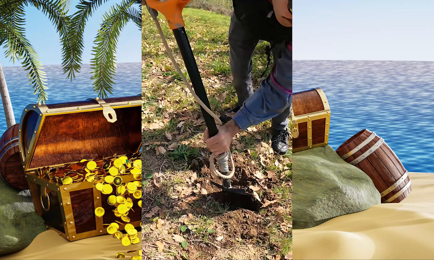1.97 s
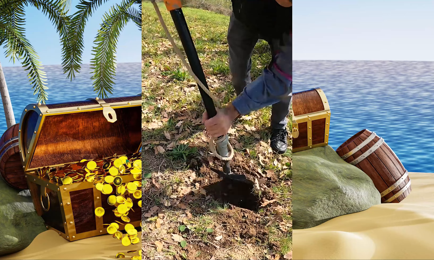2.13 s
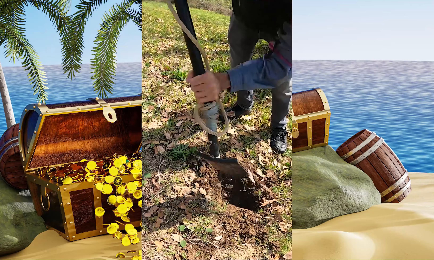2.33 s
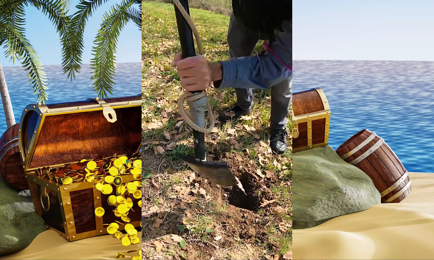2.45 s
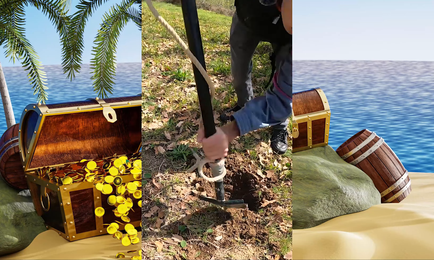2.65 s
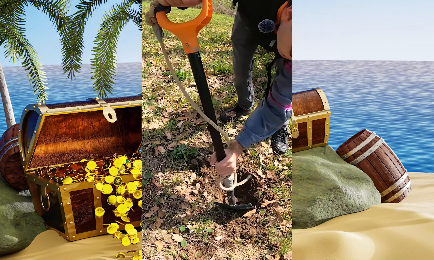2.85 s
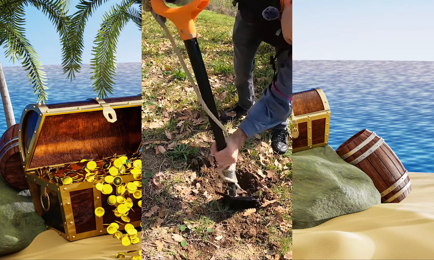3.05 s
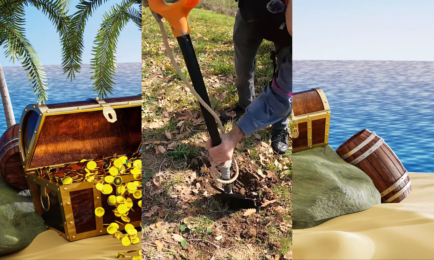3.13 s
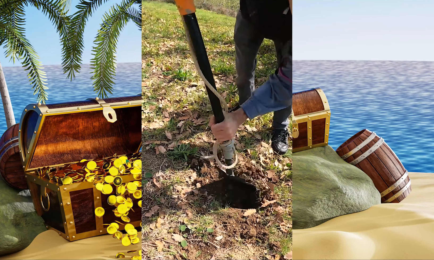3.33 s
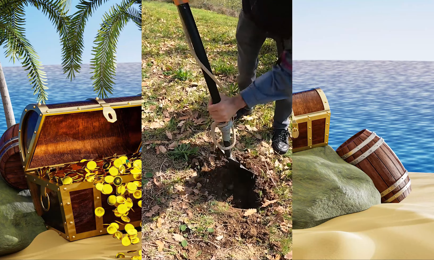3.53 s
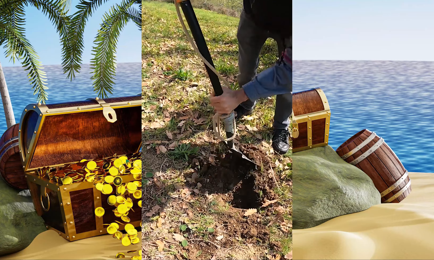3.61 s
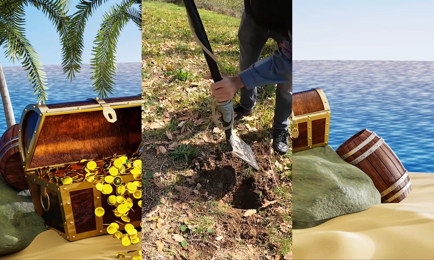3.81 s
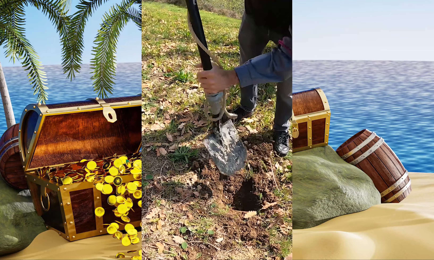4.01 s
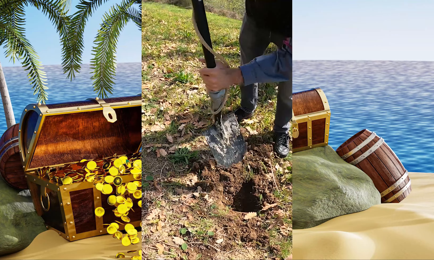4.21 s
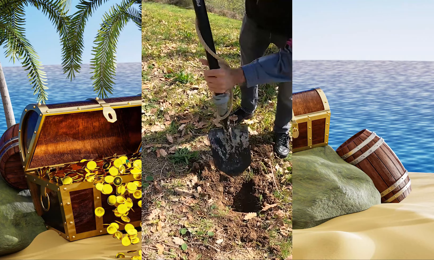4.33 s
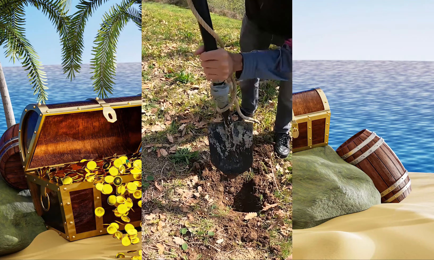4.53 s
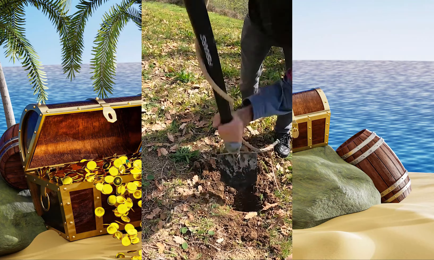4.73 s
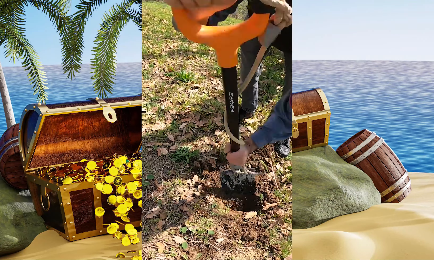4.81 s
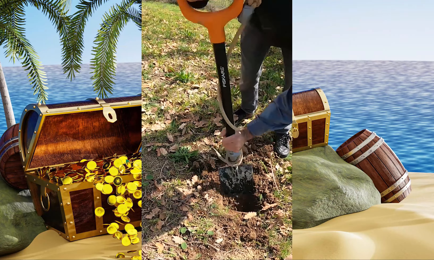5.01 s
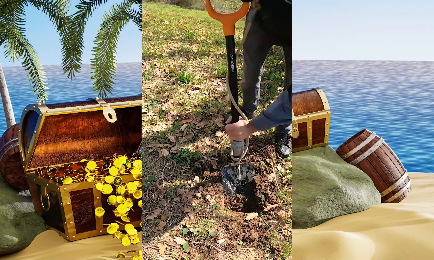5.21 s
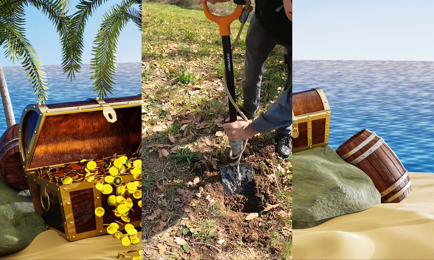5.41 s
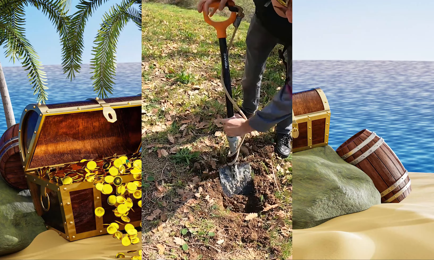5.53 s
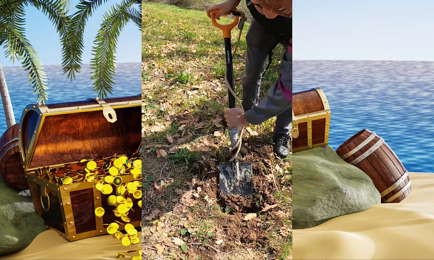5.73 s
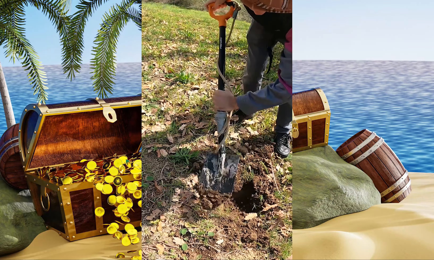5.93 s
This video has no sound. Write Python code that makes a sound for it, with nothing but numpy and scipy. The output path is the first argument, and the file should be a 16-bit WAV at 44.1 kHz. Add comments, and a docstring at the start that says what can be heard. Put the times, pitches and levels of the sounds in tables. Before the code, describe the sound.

Close, irregular spade strikes crunch and clank briefly in leafy ground, loose dirt pours and patters, and one hardest chop lands near the end.

```python
"""Outdoors, on dry ground under leaves: a steel spade chops into the soil close to the microphone.
Each bite is a burst of tiny fractures that also ring the blade briefly; the deep stabs thud the ground.
Earth pours off the lifted blade as filtered grain noise; stalks and struck stones tick, lumps land, a
pebble squeaks and crumbs patter; one hard chop follows near the end. Shaped noise gives faint wind and
distant rumble."""
import sys
import numpy as np
from scipy import signal
from scipy.fft import rfft, irfft
from scipy.io import wavfile
from scipy.ndimage import uniform_filter1d

SR = 44100
rng = np.random.default_rng(int(sys.argv[2]) if len(sys.argv) > 2 else 0)


def master_out(mix):
    """Clip the mix to full scale and print it as 16-bit PCM to the path in sys.argv[1]."""
    frames = np.transpose(np.atleast_2d(mix))
    ceiling = np.clip(frames, -1, 1)
    pcm = np.round(ceiling * 32767).astype(np.int16)
    wavfile.write(sys.argv[1], SR, pcm)


N = 262830
TIME = np.arange(N) / SR

# bites of the blade: t/s, level/dB, rise/s, push/s, then tilts before levelling: weight/dB at 250 Hz,
# knock/dB at 800-1100 Hz, grit/dB at 8 kHz; last, blade pitch/factor
BITES = [ (.177, -30.5, 0.02, 0.012, -0.5, 0.5, 2.5, 1.03), (.220, -32.5, .001, 0.0048, -13, 3.5, 2, .95),
         (.730, -39.5, 0.0016, 0.0085, -6, 5.5, -2, 1.12), (1.5, -37, .006, .001, -4.5, 0, 2.5, 1),
         (1.506, -16, 0.0029, 0.0047, -6.5, 0, 6, 1.1), (1.514, -21, 0.00054, 0.0084, -8, 6.5, -1.5, 1),
         (1.532, -38, .001, .002, 1, 2, 0.5, .96), (1.952, -49, 0.00038, 0.0079, 2, 10, -5, 1),
         (1.979, -48, 0.0032, 0.0047, -4, -15, 6, 1), (2.0, -27, 0.0021, 0.0018, -19, -12, -11, .84),
         (2.235, -46.5, .003, 0.0028, -4, 0, -2, 1), (2.249, -41.5, 0.0064, 0.02, -13.5, -3, -6.5, .95),
         (2.806, -51, 0.00091, 0.0022, -5, 8.5, -7.5, 1.2), (2.842, -49.5, 0.0074, 0.058, -10.5, -3, -3, 1),
         (2.914, -15, .006, 0.00085, -14, -13.5, -2.5, 1.03), (2.93, -38, .001, 0.015, -8, 4, 4.5, 1),
         (2.967, -44.5, .001, .006, -9, 4, -5, 1.23), (3.197, -46.5, 0.0013, 0.0018, 2, 0.5, 4.5, 1),
         (3.252, -39, 0.0037, .013, -9, -4.5, -6.5, .86), (3.447, -40, .002, 0.0022, -4.5, 8.5, -8, .95),
         (3.476, -36.5, .009, 0.0069, -10, -1, -3, .92), (3.542, -45.5, 0.0068, 0.0074, -2.5, 9, -6, .9),
         (4.989, -7, 0.0017, .002, -18.5, -1, -8.5, .99), ]


def amp(db):
    """Decibels to gain."""
    return 10 ** (np.asarray(db) / 20)


def evened(x):
    """Scales to an rms of one."""
    return x / np.sqrt(np.mean(x ** 2) + 1e-20)


def read(points, hz):
    """Reads a spectrum on a log-frequency axis."""
    f, value = np.transpose(points)
    return np.interp(np.log(hz + 1), np.log(f + 1), value)


def add(mix, s, sound):
    """Mixes a sound in at a time, cut off at the end of the mix."""
    part = mix[max(round(s * SR), 0):][:len(sound)]
    part += sound[:len(part)]


def colour(x, *spectra, size=4096):
    """Minimum-phase filter of unit energy with the product of the given spectra (f/Hz, level/dB)."""
    hz = abs(np.fft.fftfreq(size, 1 / SR))
    log_gain = np.log(amp(sum(read(points, hz) for points in spectra)))
    response = np.exp(np.conj(signal.hilbert(log_gain)))
    taps = np.fft.ifft(response).real[:size // 2]
    return signal.oaconvolve(x, taps / np.linalg.norm(taps))[:len(x)]


def wander(count, per_s):
    """Straight lines between random knots of unit spread, per_s knots a second."""
    knots = rng.standard_normal(count // 16 + 2)
    return np.interp(np.arange(count) / SR * per_s, np.arange(len(knots)), knots)


def swell(s, rise_s, fall_s, roundness=1):
    """Grows towards a moment and dies away after it."""
    distance = np.maximum((s - TIME) / rise_s, (TIME - s) / fall_s)
    return np.exp(-distance.clip(0, 20) ** roundness)


def fractures(count, per_s, spread_db):
    """A swarm of tiny breaks of random sign: many small, a few large."""
    chance, size, sign = rng.random((3, count))
    size = amp(spread_db * np.minimum(-np.log(1 - size), 4))
    breaks = chance < per_s / SR
    return evened(breaks * size * np.sign(sign - .5))


def patchy(x, patchy_db):
    """The colour of a rustle drifts as different leaves and clods take part."""
    z = signal.stft(x, nperseg=512)[2]
    patches = rng.standard_normal(z.shape)
    for axis in 0, 1:  # smooth over frequency, then time
        patches = uniform_filter1d(patches, size=12, axis=axis)
    shaped = z * amp(patchy_db * evened(patches))
    return evened(signal.istft(shaped, nperseg=512)[1][:N])


def air(level_db=-54, gust_db=1.0):
    """Light wind at the microphone over a far rumble: shaped noise whose low end gusts."""
    # wind and distant rumble: f/Hz, level per Hz/dB before levelling
    air_spectrum = [(10, 6), (30, 1.5), (55, 4.5), (90, 0), (135, -9), (250, -18), (450, -15), (850, -15.5),
                    (1400, -22.5), (2500, -33.5), (5000, -36), (10000, -40.5), (15500, -44)]
    hz = np.fft.rfftfreq(N, 1 / SR)
    wash = evened(irfft(rfft(rng.standard_normal(N)) * amp(read(air_spectrum, hz)), N))
    wind = signal.sosfilt(signal.butter(1, 150, fs=SR, output="sos"), wash)
    gusts = amp(gust_db * wander(N, per_s=23))
    return amp(level_db) * (wash + wind * (gusts - 1))


def scatter(x, wet_db, t60=0.17, rise_s=0.021):
    """Open ground scatters a short, diffuse tail: decaying noise that swells in first."""
    t = np.arange(SR // 3) / SR
    tail = rng.standard_normal(len(t)) * np.minimum(t / rise_s, 1) ** 2 * amp(-60 * t / t60)
    tail = colour(tail, [(150, 3.5), (700, 2.5), (2500, -4.5), (8000, -3.5), (15000, 2.5)])
    return amp(wet_db) * signal.oaconvolve(x, tail / np.linalg.norm(tail))[:N]


def loose_earth():
    """Flow and coarseness of all that moves: a trickle, the pour, each rustle and the spill round bites."""
    # earth pouring off the lifted blade: t/s, flow level/dB
    pour_levels = [(3.451, -77), (3.52, -57.5), (3.64, -61), (3.8, -55.5), (4.03, -49.5), (4.09, -60),
                   (4.2, -65.5), (4.3, -78)]
    # nudged leaves and loose earth: t/s at the peak, flow level/dB, length/s,
    # coarseness/dB (more clods, less fine dust)
    rustles = [(.01, -52.5, 0.11, -11), (.12, -65, 0.11, 13), (.68, -63.5, .08, -7), (.86, -61.5, 0.16, -4),
               (1.245, -62, 0.15, 10.5), (1.42, -63.5, 0.098, -6), (1.65, -63, 0.19, 0),
               (1.89, -65, .06, -12), (3.09, -68.5, .12, 18), (3.33, -63.5, 0.042, 8),
               (4.28, -66.5, .07, -19), (4.52, -66.5, 0.114, -10.5), (4.85, -68.5, 0.23, 1),
               (5.379, -60, 0.22, 10), (5.66, -68, .3, 0)]
    rustle_rise = 0.43  # share of a rustle's length spent swelling
    spill_db, spill_db_per_db = -55, 0.25  # flow at a bite of 0 dB, and its change per dB of bite
    spill_above_db = -44  # lighter touches stir nothing
    spill_lead_s, spill_settle_s, spill_coarse_db = 0.07, 0.088, 4.5
    after_db, after_settle_s = -10, .33  # part of each spill keeps running down the heap

    moves = [(amp(-78.5), 0.5)]  # the heap never quite rests
    s, pour_db = np.transpose(pour_levels)
    pour = amp(np.interp(TIME, s, pour_db)) * (TIME > s[0]) * (TIME < s[-1])
    moves.append((pour, 6.5 - 14 * (TIME - s[0])))  # clods leave first, dust last
    for peak_s, db, length, coarse_db in rustles:
        rustle = swell(peak_s, length * rustle_rise, length * (1 - rustle_rise), roundness=2.1)
        moves.append((amp(db) * rustle, coarse_db))
    for share_db, settle_s in (0, spill_settle_s), (after_db, after_settle_s):
        spills = [amp(spill_db + share_db + spill_db_per_db * db) * swell(bite_s, spill_lead_s, settle_s)
                  for bite_s, db, *_ in BITES if db > spill_above_db]
        moves.append((np.max(spills, axis=0), spill_coarse_db))
    power = sum(flow ** 2 for flow, _ in moves)
    coarseness = sum(flow ** 2 * coarse_db for flow, coarse_db in moves) / power
    return np.sqrt(power), coarseness


def sliding(flow, coarse_db, fine_db=-0.5, crumb_db=-10, body_db=-7, dust_db=-20, clump_db=2.44):
    """Fine earth hisses over steel and leaves, crumbs tick in it; clods are duller, dust is brighter."""
    # sliding fine earth: f/Hz, level per Hz/dB before levelling
    sand = [(300, -16), (900, -4.5), (1500, -5), (2600, -7), (3700, -1.5), (4500, -4.5), (6300, -2.5),
            (8000, -4.5), (10300, -11.5), (12000, -15), (15500, -25.5)]
    flow = flow * amp(clump_db * wander(N, per_s=62))
    grains = fractures(N, per_s=20000, spread_db=1)
    grains = grains + amp(crumb_db) * fractures(N, per_s=490, spread_db=8.5)
    fine = amp(fine_db) * patchy(colour(grains, sand), patchy_db=1.1)
    clods = colour(fractures(N, per_s=3900, spread_db=4.5), [
        (60, -6), (200, -1.0), (500, -5.5), (1500, 1), (2400, -2.0), (4000, -14.0), (8000, -31.0)])
    clods = amp(body_db + coarse_db) * patchy(clods, patchy_db=4.0)
    dust = colour(fractures(N, per_s=9000, spread_db=2.0), [
        (2000, -30.5), (7000, -3), (11000, 1.5), (13500, 0), (15500, -5)])
    return flow * (fine + clods + amp(dust_db - coarse_db) * dust)


def patter(flow, level_db=-70, fade_s=.002, follow=.4):
    """Single grains hop over dry leaves; they stand out most when little else is moving."""
    hops = abs(fractures(N, per_s=59, spread_db=4.0))
    fades = signal.lfilter([1], [1, -np.exp(-1 / (fade_s * SR))], hops)
    crackle = evened(colour(fades * rng.standard_normal(N), [
        (300, -16.5), (1500, -6.5), (4000, 0.0), (8000, -0.5), (11000, -8.0), (15500, -18.5)]))
    return crackle * amp(level_db) * evened(flow) ** follow


def lumps(fade_s=0.019):
    """Each lump of earth lands with a dull pat: a fading noise burst, low-coloured."""
    # soft landings: t/s, level/dB at the start
    landings = [(.35, -54), (.72, -57.5), (3.553, -48), (3.85, -50), (5.209, -49.5), (5.378, -49),
                (5.526, -52.5)]
    out, t = np.zeros(N), np.arange(SR // 10) / SR
    for s, db in landings:
        add(out, s, amp(db) * rng.standard_normal(len(t)) * np.exp(-t / fade_s))
    return colour(out, [(60, 0), (170, -1.0), (300, -0.5), (500, -10), (1400, -16.5), (4000, -43)])


def squeak(s=2.967, hz=4200, level_db=-43, length_s=0.015, waver=.012):
    """The edge grazes a pebble and sings for a moment: a short, wavering sine."""
    out, t = np.zeros(N), np.arange(round(length_s * SR)) / SR
    turns = np.cumsum(hz * (1 + waver * wander(len(t), per_s=500))) / SR
    envelope = np.sin(np.pi * np.sqrt(t / length_s))
    add(out, s, amp(level_db) * envelope * np.sin(2 * np.pi * turns))
    return out


def ticks(level_db=-7, fade_s=0.0039, debris_db=-13, debris_s=0.012):
    """Short ticks with a little debris: stalks and crumbs snap, and the blade's edge strikes small stones."""
    # ticks of snapping pieces and struck stones: t/s, level/dB before the common level_db
    moments = [(0.0782, -43.5), (.188, -33), (0.2367, -35), (0.632, -43), (.646, -45), (0.8128, -45.5),
               (0.8764, -42), (1.217, -44), (1.3734, -46.5), (1.402, -42.5), (1.5229, -12.5), (1.8193, -46),
               (1.97, -44), (2.021, -41), (2.0635, -40.5), (2.289, -48), (3.049, -46.5), (3.267, -29),
               (3.28, -36.5), (3.3496, -51.5), (3.505, -43), (3.5275, -47), (4.1557, -48), (4.3698, -47),
               (4.4486, -44.5), (5.018, -27.5), (5.2176, -50.5), (5.595, -48.5)]
    tick_spectrum = [(200, 0.5), (1200, 4.0), (3000, 0), (7000, 4.0), (10000, -8.5), (12000, -10.5),
                     (15500, -27.5)]
    out, t = np.zeros(N), np.arange(SR // 10) / SR
    fade = np.exp(-t / fade_s) + amp(debris_db) * np.exp(-t / debris_s)
    for s, db in moments:
        tick = fractures(len(t), per_s=30000, spread_db=5.5) * fade
        # no two ticks sound alike
        own = np.transpose([np.geomspace(1000, 12000, num=9), 3 * rng.standard_normal(9)])
        add(out, s, amp(db + level_db) * colour(tick, own, tick_spectrum))
    return out


def thuds(t60=.35):
    """The ground shakes briefly under the deep stabs: decaying low noise."""
    # blows taken by the ground: t/s, level/dB
    blows = [(0.202, -38), (1.514, -31.5), (2.921, -35.5), (4.998, -35.5)]
    out, t = np.zeros(N), np.arange(SR // 2) / SR
    fade = amp(-60 * t / t60)
    for s, db in blows:
        shake = colour(rng.standard_normal(len(t)) * fade, [
            (14, 6), (30, -2), (70, 0.0), (130, -13.5), (300, -23.5), (1000, -68.5)])
        add(out, s, amp(db) * shake * np.linalg.norm(fade) / np.linalg.norm(shake))
    return out


def blade(force, pitch):
    """The steel rings in damped modes; its pitch shifts with how firmly the earth grips it."""
    # modes damped by the earth: f/Hz at pitch 1, level/dB before the 1/sqrt(t60) weight, t60/s
    modes = [(541, -1.5, .06), (641, -8.5, 0.12), (876.4, -1.5, 0.041), (1240, -0.5, 0.0097),
             (1499, -5.5, .04), (1616, -3, 0.03), (2130, -11, 0.046), (2733, -0.5, 0.018),
             (3417, -0.5, 0.023), (4045, -4.5, .025), (5370, -5.5, 0.016), (6860, -6.5, 0.029),
             (7150, -6, .022), (7490, -5, 0.032), (9460, -5, 0.027)]
    t = np.arange(SR // 8) / SR
    ring = sum(amp(db - 60 * t / t60) * np.sin(2 * np.pi * hz * pitch * t) / np.sqrt(t60)
               for hz, db, t60 in modes)
    return signal.oaconvolve(force, ring / np.linalg.norm(ring))[:len(force)]


def bites(clump_db=2, ring_db=-5, wall_s=0.003, wall_share=0.099):
    """Soil breaks while the blade pushes; the wall of the hole returns each crunch a moment later."""
    # breaking soil: f/Hz, level per Hz/dB before tilts and levelling
    crunch = [(40, -6.5), (150, 1.5), (330, -5), (550, -2.5), (3400, 0), (4600, 0.5), (7000, 1),
              (10200, -2), (11600, -14), (15500, -24.5)]
    release_t60 = .02  # s; the crunch dies once the blade stops
    crumble_t60 = 0.12  # s; the cut goes on crumbling a little longer
    out, t = np.zeros(N), np.arange(SR // 3) / SR
    for s, db, rise, push, weight_db, knock_db, grit_db, pitch in BITES:
        stopped = np.maximum(t - rise - push, 0)
        crumble = amp(-21.5 + 0.18 * db)  # harder bites crumble more for their size
        release = (1 - crumble) * amp(-60 * stopped / release_t60)
        release = release + crumble * amp(-60 * stopped / crumble_t60)
        stroke = np.minimum(t / rise, 1) * release
        force = stroke * fractures(len(t), per_s=20000, spread_db=2)
        force = force * amp(clump_db * wander(len(t), per_s=390))
        sound = force + amp(ring_db) * blade(force, pitch)  # each fracture also taps the steel
        sound = sound + wall_share * np.interp(t - wall_s / pitch, t, sound, left=0)
        tilts = [(250, weight_db), (800, knock_db), (1100, knock_db), (2700, 0.0039), (3600, 0.0021),
                 (8000, grit_db)]
        sound = colour(sound, crunch, tilts)
        add(out, s, amp(db) * sound * np.linalg.norm(stroke) / np.linalg.norm(sound))
    return out


def scene():
    """The digging is dead centre; only a faint hiss and a trace of scatter differ between the ears."""
    digging = bites() + ticks() + lumps() + squeak()
    flow, coarse_db = loose_earth()
    mid = digging + scatter(digging, wet_db=-27.5) + thuds()
    mid = mid + sliding(flow, coarse_db) + patter(flow) + air()
    hiss = amp(-74.5) * colour(rng.standard_normal(N), [
        (40, -4.0), (120, -5), (250, -5.5), (500, -7), (1000, -13.5), (4000, -20.5), (9000, -19.5),
        (15000, -19.0)])
    stray = colour(digging, [
        (200, -4.5), (1000, -11.5), (2500, -13.0), (4500, -3), (9000, -3), (13000, 14.0)])
    side = hiss + scatter(stray, wet_db=-20.5, t60=.03, rise_s=.002)
    return np.array([mid + side, mid - side])


def record(dry, ceiling=0.9, edge_hz=15900):
    """The hardest peaks are rounded off softly; then a low-pass limits the band."""
    rounded = dry / (1 + (dry / ceiling) ** 4) ** (1 / 4)
    low_pass = signal.firwin(255, edge_hz, window=("kaiser", 9), fs=SR)
    return signal.oaconvolve(rounded, low_pass[None], "same")


dry = scene()
out = record(dry)
master_out(out)
```